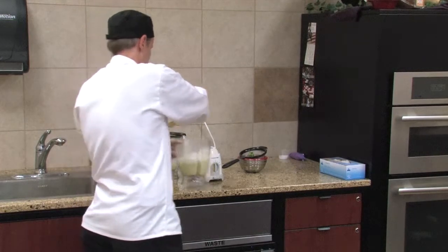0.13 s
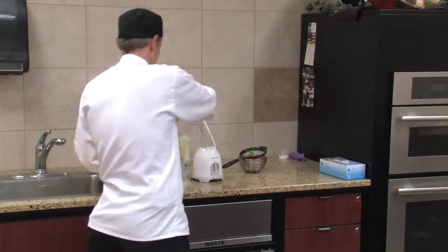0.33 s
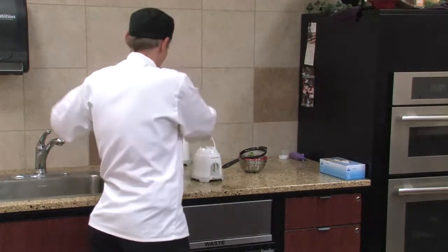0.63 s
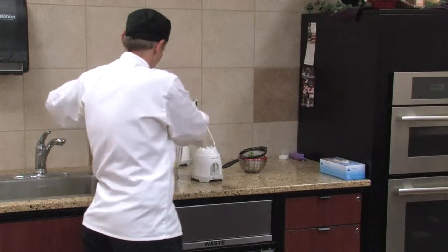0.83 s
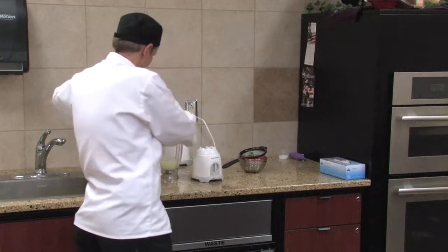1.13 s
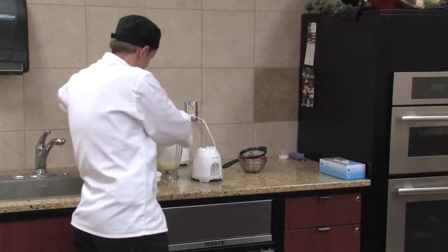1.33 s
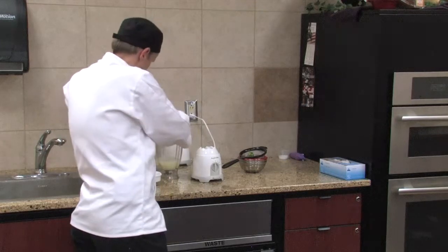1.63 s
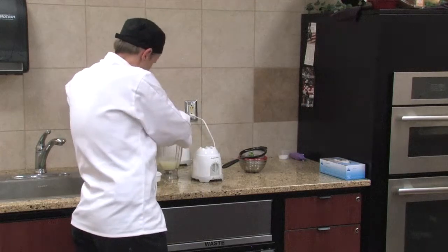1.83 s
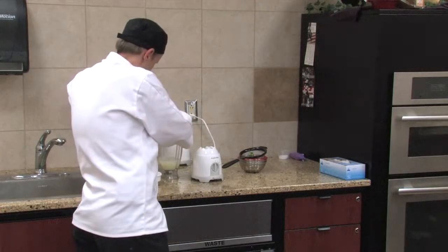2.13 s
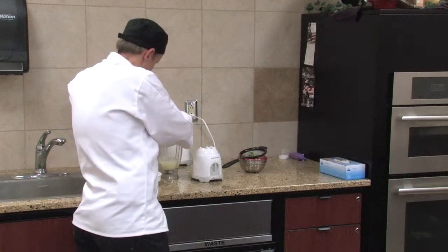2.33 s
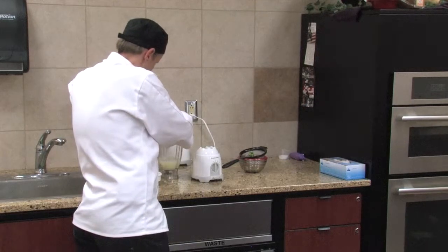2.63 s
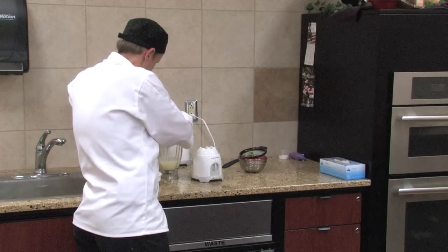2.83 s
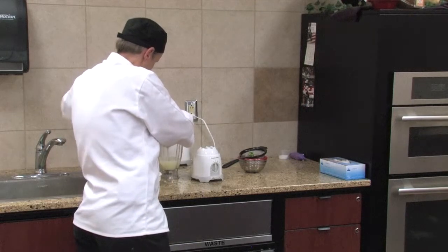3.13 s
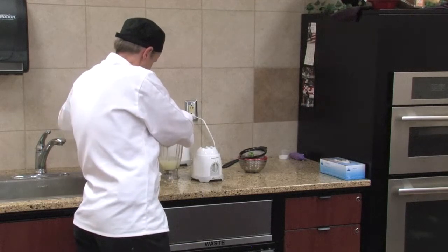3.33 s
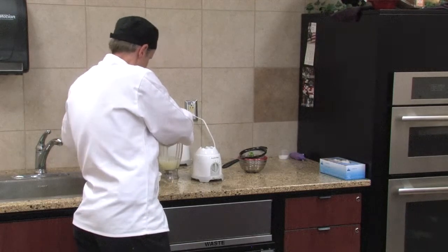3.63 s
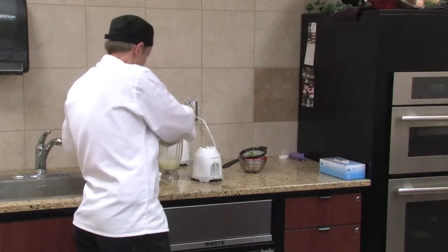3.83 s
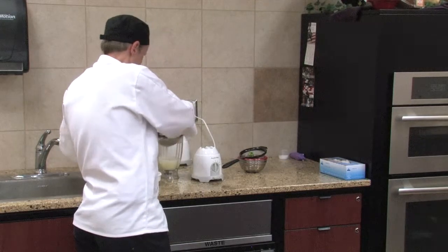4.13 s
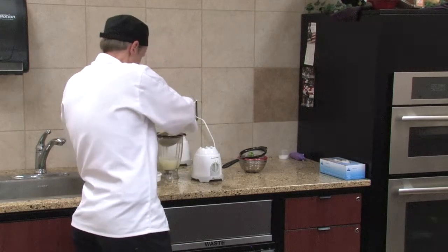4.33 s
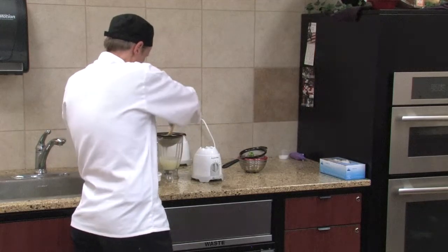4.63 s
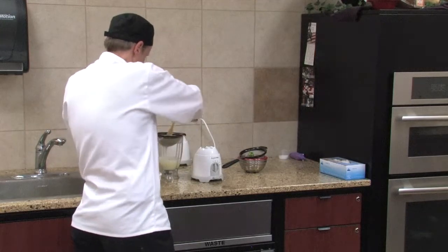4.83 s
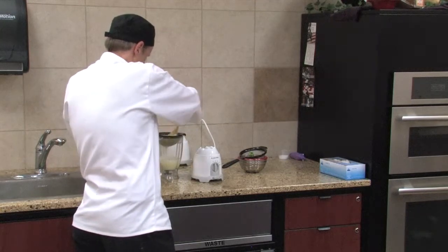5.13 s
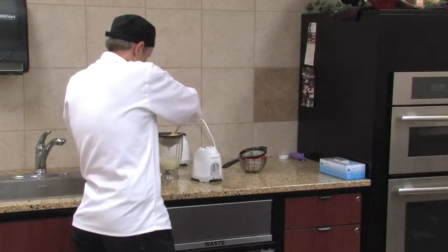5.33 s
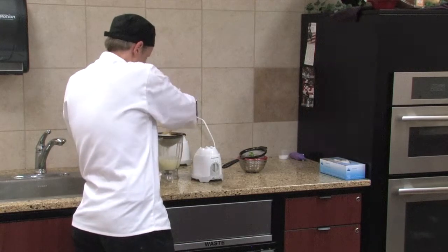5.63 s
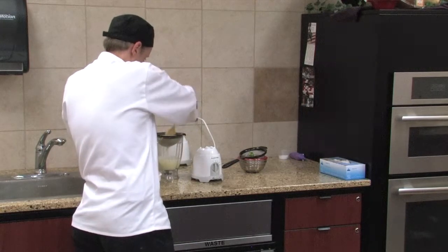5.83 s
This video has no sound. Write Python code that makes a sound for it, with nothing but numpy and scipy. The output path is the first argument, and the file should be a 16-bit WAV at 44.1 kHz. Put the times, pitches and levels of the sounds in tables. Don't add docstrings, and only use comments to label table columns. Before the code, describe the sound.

In a tiled kitchen, hollow glass knocks, a wet pour with glugs, a heavy set-down, then sputtering drips through a metal sieve.

```python
import sys
import numpy as np
from scipy import signal
from scipy.fft import rfft, irfft, next_fast_len
from scipy.io import wavfile
from scipy.ndimage import map_coordinates

SR = 44100
rng = np.random.default_rng(int(sys.argv[2]) if len(sys.argv) > 2 else 0)


def wav_out(sig):
    wavfile.write(sys.argv[1], SR, np.round(np.clip(np.atleast_2d(sig).T, -1, 1) * 32767).astype(np.int16))


def boost_factor(decibels):
    exponent = np.asarray(decibels, float) / 20
    return 10 ** exponent


N = 264578

# frequency in Hz, width in Hz, level in dB.
GLASS_RESONANCES = [(698, 47, 6.5), (1030, 62, -6), (1250, 47, -21), (1590, 53, -4), (2050, 430, -41)]
# time in seconds, frequency in Hz.
AIR_COLUMN = [(0, 480), (2.2, 475), (2.8, 440), (3.3, 415), (4.5, 470), (5.2, 400), (6, 420)]


def unit(x):
    return x / np.sqrt(np.mean(x ** 2) + 1e-20)


def along(points, hz):
    f, v = np.transpose(points)
    return np.interp(np.log(hz + 1), np.log(f + 1), v)


def filtered(x, response):
    m = next_fast_len(len(x) + min(len(x) // 2, 8192))
    hz = np.fft.rfftfreq(m, 1 / SR)
    return irfft(rfft(x, m) * response(hz), m)[:len(x)]


def resonances(peaks):
    def response(f):
        total = 0
        for k, (hz, width, db) in enumerate(peaks):
            damping = 1j * f * width
            total = total + (-1) ** k * boost_factor(db) * damping / (hz * hz - f * f + damping)
        return total
    return response


def add(track, s, sound):
    part = track[round(s * SR):][:len(sound)]
    part += sound[:len(part)]


def wobble(rate):
    knots = rng.standard_normal(int(N * rate / SR) + 4)
    return map_coordinates(knots, [np.arange(N) * rate / SR])


def uneven(spread_db):
    return boost_factor(spread_db * rng.standard_normal(N).clip(-2, 2))


def burst(t, t60, hz, width_hz):
    band = resonances([(hz, width_hz, 0)])
    noise = rng.standard_normal(len(t)) * boost_factor(-60 * t / t60)
    return filtered(noise, lambda f: band(f) ** 3)


def ring(modes, t, attack, scatter_db, turn=0.16):
    tones = 0
    for k, (hz, db, t60) in enumerate(modes):
        strength, phase = rng.standard_normal(2)
        level = boost_factor(db + scatter_db * strength - 60 * t / t60)
        tones = tones + (-1) ** k * level * np.sin(2 * np.pi * (hz * t + turn * phase))
    return tones * (1 - np.exp(-t / attack))


def room(x, wet_db):
    # frequency in Hz, t60 in seconds.
    tiles = [(100, 1), (500, 0.34), (2000, 0.42), (6000, 0.26), (14000, 0.35)]
    hz, t, z = signal.stft(rng.standard_normal(SR // 2), SR, nperseg=256)
    decay = boost_factor(-60 * t / along(tiles, hz)[:, None])
    tail = signal.istft(z * decay, SR, nperseg=256)[1]
    delayed = np.pad(x, (250, 0))
    wet = boost_factor(wet_db) * signal.fftconvolve(delayed, tail / np.linalg.norm(tail))
    wet[:len(x)] += x
    return wet


def knocks(table, body, wall, attack, body_db, rough_db, wall_db, wet_db, thud_db):
    # frequency in Hz, level in dB, t60 in seconds.
    slab = [(70, -6, .15), (97, -1, .15), (118, -2, .16), (160, -1, .14), (220, -5, .1)]
    settle_db = 4
    out, t = np.zeros(N), np.arange(SR // 4) / SR
    for k, (s, db, hollow_db, sharp_db, bright_db) in enumerate(table):
        crack = boost_factor(3.5) * burst(t, 0.049, 1330, 2330)
        crack += boost_factor(sharp_db + 1.5) * burst(t, 0.038, 3530, 3130)
        crack += boost_factor(bright_db + 4.5) * burst(t, 0.037, 6760, 6500)
        hollow = ring(body, t, attack, scatter_db=3.5, turn=0.1)
        hollow += boost_factor(rough_db) * burst(t, 0.18, 380, 910)
        thud = boost_factor(thud_db - settle_db * k) * ring(slab, t, 0.0016, scatter_db=-0.5, turn=0.025)
        blow = boost_factor(db) * (crack + boost_factor(hollow_db + body_db) * hollow) + thud
        add(out, s, room(blow, wet_db))
        rattle = 0.94 + 0.56 * map_coordinates(rng.standard_normal(80), [t * 240])
        add(out, s, boost_factor(db + wall_db) * ring(wall, t, 0.0015, scatter_db=2.5) * rattle)
    return out


def drops(table, cycles, rise, spray_s, spray_db, level_db, spread=1.44):
    out, t = np.zeros(N), np.arange(SR // 12) / SR
    for s, db, hz in table:
        life = cycles / hz
        tone = np.sin(2 * np.pi * hz * t * (1 + rise * t / life))
        bubble = tone * np.exp(-t / life) * (1 - np.exp(-3 * t / life))
        spray = boost_factor(spray_db) * burst(t, spray_s, hz, spread * hz)
        add(out, s, boost_factor(db + level_db) * (bubble + spray))
    return out


def kitchen():
    # frequency in Hz, level in dB per Hz.
    tone_spectrum = [(20, -16), (38, -33), (50, 0.5), (100, -6), (170, -8.5), (250, -12), (390, -16.5),
                     (440, -18.5), (700, -24), (1370, -36.5), (2350, -39.5), (3250, -42), (9800, -46),
                     (15500, -47.5)]
    # frequency in Hz, width in Hz, level in dB.
    hum_lines = [(60.13, 0.83, 1.5), (115.8, 5.6, -10), (92, 7.9, -4.5), (400, 25, -18.5)]
    air = unit(filtered(rng.standard_normal(N), lambda f: boost_factor(along(tone_spectrum, f))))
    lines = resonances(hum_lines)
    hum = unit(filtered(rng.standard_normal(N), lambda f: lines(f) * (f > 45)))
    motor_hz = 58 + 1.44 * wobble(2.66)
    motor = np.sin(2 * np.pi * np.cumsum(motor_hz) / SR)
    return boost_factor(-52) * (boost_factor(-1.5) * air + boost_factor(-6.5) * hum + boost_factor(-5.5) * motor)


def flow(now):
    # time in seconds, flow in dB, weight of its slaps against the flow in dB.
    stretches = [
        [(0.0, -60.5, 3), (0.378, -72, 0.5), (0.62, -82, -5)],
        [(1.715, -64, -23), (1.993, -66.5, 0.5), (2.481, -69, 8.5), (3.02, -69.5, 6)],
        [(3.14, -71, 12.5), (3.522, -77, 6.5), (3.85, -75, 12.5)],
        [(4.08, -63.5, 9.5), (4.244, -68.5, 8.5), (5.036, -73.5, 9.5), (5.234, -68.5, 11.5), (6.0, -70, 5)],
    ]
    level = np.zeros((2, len(now)))
    for rows in stretches:
        s, flow_db, weight_db = np.transpose(rows)
        for gain, curve in zip(level, (flow_db, flow_db + weight_db)):
            gain += boost_factor(np.interp(now, s, curve, left=-120, right=-120))
    return level


def stream():
    # frequency in Hz, level in dB per Hz.
    fizz = [(2000, -6), (2530, -2), (3280, 8), (3710, 2.5), (4340, 4), (7640, 4), (12000, -6), (16000, -9)]
    # frequency in Hz, width in Hz, level in dB.
    foam_sizes = [(3200, 1700, -4.5), (6600, 3400, 7.5), (11000, 5700, 2)]
    fall_s = (1.715, 3.02)
    now = np.arange(N) / SR
    thin, heavy = flow(now)

    clumps = boost_factor(2.4 * wobble(45) + 4.1 * wobble(300))
    spray = unit(filtered(rng.standard_normal(N), lambda f: boost_factor(along(fizz, f))) * clumps)
    crackle_per_s = 350
    pops = (rng.random(N) < crackle_per_s / SR) * uneven(6) * rng.choice([-1, 1], N)
    sizes, t = rng.integers(len(foam_sizes), size=N), np.arange(SR // 100) / SR
    foam = np.zeros(N)
    for k, (hz, width, db) in enumerate(foam_sizes):
        pop = unit(burst(t, 0.0095, hz, width))
        foam += boost_factor(db) * signal.fftconvolve(pops * clumps * (sizes == k), pop)[:N]
    spray += boost_factor(-2.0) * unit(foam) * (now > fall_s[0]) * (now < fall_s[1])

    slaps_per_s = 300
    slaps = (rng.random(N) < slaps_per_s / SR) * rng.standard_normal(N)
    slosh = unit(filtered(slaps, resonances(GLASS_RESONANCES)))
    column_hz = np.interp(now, *np.transpose(AIR_COLUMN)) + 18 * wobble(30)
    air = unit(wobble(45) * np.sin(2 * np.pi * np.cumsum(column_hz) / SR))
    return boost_factor(-5.5) * thin * spray + heavy * (boost_factor(-9.5) * slosh + boost_factor(-5.5) * air)


def patter():
    drops_per_s = 90
    when = (rng.random(N) < drops_per_s / SR) * uneven(5)
    kinds, t = rng.integers(4, size=N), np.arange(SR // 20) / SR
    ticks = np.zeros(N)
    for k in range(4):
        tick = burst(t, 0.025, hz=1400, width_hz=1300)
        ticks += signal.fftconvolve(when * (kinds == k), tick)[:N]
    heavy = flow(np.arange(N) / SR)[1]
    return boost_factor(-16) * heavy * unit(ticks)


def scuffs():
    # start in seconds, length in seconds, level in dB, centre in Hz.
    strokes = [(0.033, 0.07, -64.5, 6260), (0.22, .03, -76, 7500), (2.047, 0.029, -60, 4600),
               (2.467, 0.047, -65, 5300), (2.781, 0.033, -64.5, 4870), (4.135, 0.035, -72, 11000),
               (4.129, 0.047, -58, 4900), (5.446, 0.083, -68, 3500), (5.774, 0.12, -63.5, 4200)]
    out = np.zeros(N + SR)
    for s, length, db, hz in strokes:
        swell = np.hanning(round(0.75 * length * SR)) ** 0.5
        knots = rng.standard_normal(60)
        grain = boost_factor(0.54 * map_coordinates(knots, [np.arange(len(swell)) * 400 / SR]))
        steady = unit(burst(np.zeros(len(swell)), 1, hz, 1.5 * hz))
        add(out, s, boost_factor(db) * swell * grain * steady)
    return out[:N]


def hand_ticks():
    # time in seconds, peak in dB, pitch in Hz.
    ticks = [(0.075, -48, 4300), (0.5182, -50, 5420), (0.598, -50.5, 6330), (1.3712, -49.5, 11600),
             (4.3076, -52.5, 8630), (4.4902, -51, 4420), (4.5735, -44, 5950), (4.6354, -45.5, 4550),
             (4.7361, -48, 4150), (4.8514, -52, 4010), (4.9332, -48, 3920), (5.1457, -50, 4000),
             (5.243, -49, 4560), (5.2874, -49, 6250), (5.3936, -52, 4500), (5.502, -53, 4570),
             (5.7967, -52, 5170), (5.8476, -42, 3960), (5.893, -48, 4570), (0.2049, -45.5, 2800)]
    return drops(ticks, 5.7, 0.0052, 0.031, spray_db=-1.0, level_db=-5.5, spread=1.3)


def splats():
    # time in seconds, peak in dB, pitch in Hz.
    free_blobs = [(0.112, -50.5, 810), (0.151, -42.5, 608), (0.259, -51.5, 775), (1.721, -52.5, 1890),
                  (1.876, -55, 1440), (1.922, -54, 1150), (2.051, -52, 1900), (2.074, -46, 1393),
                  (2.246, -49, 1096), (2.342, -50, 1030), (2.393, -49, 1070), (2.492, -48.5, 1660),
                  (2.541, -41, 1030), (2.61, -55, 1670), (2.639, -50, 1415), (2.751, -44, 995),
                  (2.774, -51, 1420), (2.954, -51.5, 1450), (2.987, -48, 1030), (3.249, -51, 972),
                  (3.373, -53, 950), (3.464, -56, 1250), (3.593, -45.5, 1000), (3.655, -52.5, 1445),
                  (3.695, -57, 1640), (3.747, -46, 974), (3.797, -45.5, 1000)]
    # time in seconds, peak in dB, pitch in Hz.
    mesh_blobs = [(4.1064, -68, 1040), (4.2348, -54, 991), (4.2931, -43, 1590), (4.4927, -44.5, 1530),
                  (4.5421, -39, 1004), (4.6523, -47.5, 1190), (4.6813, -44.5, 1204), (4.7366, -49.5, 903),
                  (4.9038, -50, 1570), (4.9631, -50, 1490), (5.0519, -53, 1200), (5.1183, -51.5, 1180),
                  (5.1472, -63, 1020), (5.1911, -48, 1010), (5.2305, -51, 1040), (5.3527, -55, 1580),
                  (5.3946, -42, 1023), (5.477, -39, 1030), (5.5044, -46, 1640), (5.658, -41, 964),
                  (5.7568, -44.5, 1000), (5.7857, -45, 1010), (5.8486, -49, 990), (5.914, -49.5, 1300)]
    blobs = drops(free_blobs + mesh_blobs, 7, 0.018, 0.06, spray_db=7.0, level_db=-4.5, spread=1.25)
    return blobs + boost_factor(8.5) * filtered(blobs, resonances(GLASS_RESONANCES))


def droplets():
    # time in seconds, peak in dB, pitch in Hz.
    fingers = [(0.1216, -46, 5800), (0.1296, -46, 3400), (0.1496, -49, 5100), (0.2314, -58, 8500),
               (0.2405, -56, 4860), (0.288, -71, 3150), (0.3536, -48, 4020), (0.3726, -53, 3630),
               (0.4589, -59, 7590)]
    # time in seconds, peak in dB, pitch in Hz.
    bursting = [(1.7193, -45.5, 5500), (1.7593, -56, 6270), (1.7762, -54, 7100), (1.8091, -55, 6700),
                (1.8206, -58, 4440), (1.8401, -61, 6760), (1.862, -46, 6750), (1.9229, -60, 6910),
                (1.9329, -52, 6780), (1.9334, -45, 9500), (1.9668, -58, 5960), (1.9718, -58, 6030),
                (1.9872, -52, 4450), (2.02, -53, 5300), (2.0586, -58, 4200), (2.0583, -46.5, 9150),
                (2.0765, -39, 4350), (2.109, -50, 4300), (2.1578, -51, 5800), (2.182, -47, 5260),
                (2.2167, -65, 4200), (2.2167, -50, 6740), (2.2656, -66, 7040), (2.2658, -48.5, 4350),
                (2.2965, -52, 7600), (2.3235, -46.5, 7350), (2.3704, -56, 4480), (2.3908, -49, 5750),
                (2.4113, -57, 7430), (2.4183, -55, 4220), (2.4557, -56, 4300), (2.4806, -55, 5640),
                (2.4811, -50, 4300), (2.538, -52, 5240), (2.5524, -48, 6570), (2.587, -52, 5930),
                (2.6462, -66, 7630), (2.6582, -59, 6000), (2.6716, -52, 5990), (2.6966, -52, 4330),
                (2.7463, -53, 5950), (2.7884, -57, 7500), (2.7884, -48, 4710), (2.8258, -65, 4320),
                (2.856, -55, 4230), (2.8842, -56, 4620), (2.9121, -52, 7400), (2.9485, -57, 5670),
                (2.9835, -60, 6010), (3.0079, -59, 6360)]
    return drops(bursting + fingers, 10, 0.004, 0.022, spray_db=3, level_db=-4, spread=1.2)


def low_clinks():
    # time in seconds, peak in dB.
    touches = [(0.1521, -54.5), (3.2544, -61), (3.2954, -66), (3.4336, -59.5)]
    second_mode_hz = 2060
    pitched = [(s, db, second_mode_hz) for s, db in touches]
    return drops(pitched, 11, 0.001, 0.015, spray_db=6, level_db=2.5)


def rim_knocks():
    # time in seconds, crack peak in dB, then hollow, sharp and bright parts in dB against the crack.
    blows = [(0.6614, -31, -1, -4, -20.5), (0.7658, -29.5, -2, 0.5, -36), (0.7944, -46.5, 10, -10, -19),
             (0.8119, -30, 1.5, -3, -20.5), (0.9158, -29.5, -8.5, 9.5, -5), (0.9317, -46, 13.5, -23, -26),
             (0.9492, -33, -4.5, -2, -32), (0.9714, -40, 5.5, -18, -33)]
    # frequency in Hz, level in dB, t60 in seconds.
    hollow_jar = [(300, -13.5, 0.067), (393, -7.5, 0.079), (436, -0.5, 0.036), (506, 4.5, 0.067),
                  (583, -29, 0.018), (715, -21, 0.089), (803, -4.5, 0.027)]
    # frequency in Hz, level in dB, t60 in seconds.
    glass_wall = [(1338, -2.5, 0.14), (1686, 6, 0.068), (1890, -14, 0.14), (2453, -1.5, 0.061),
                  (3230, -7, 0.089), (3400, 9, 0.018), (3720, 5.5, 0.027), (5020, -13, 0.045)]
    return knocks(blows, hollow_jar, glass_wall, 0.004, body_db=7, rough_db=-7,
                  wall_db=-13.0, wet_db=-14, thud_db=-45.5)


def snaps():
    # time in seconds, peak in dB, pitch in Hz.
    wires = [(0.8764, -61, 10400), (3.1552, -54, 7430), (3.4615, -54, 10700), (3.7459, -57, 12300),
             (3.9454, -56, 12200), (4.1056, -43, 12500), (4.1061, -41, 7400), (4.1415, -38, 11400),
             (4.327, -56, 7000), (4.435, -63, 7500), (4.564, -59, 8500), (4.6493, -56, 8000),
             (4.714, -60, 8000), (4.802, -63, 7000), (4.9112, -56, 8420), (4.9337, -56, 8410),
             (5.3063, -54, 8610)]
    return drops(wires, 6, 0.004, 0.013, spray_db=2.5, level_db=-5.0, spread=0.84)


def flecks():
    # time in seconds, peak in dB, pitch in Hz.
    flicks = [(1.7193, -60, 2610), (1.7702, -53, 2850), (1.8016, -63, 2990), (1.8425, -66, 2900),
              (1.862, -60, 4000), (1.8764, -57, 2800), (1.9183, -59, 1940), (1.9667, -63, 3110),
              (1.9877, -54, 3250), (2.0206, -49.5, 3250), (2.059, -47, 3170), (2.0765, -46, 3240),
              (2.1089, -58, 3270), (2.1538, -53, 2800), (2.2172, -55, 2860), (2.2655, -55, 3290),
              (2.2925, -51, 3150), (2.3229, -50, 3560), (2.3414, -54, 2020), (2.3718, -59, 3140),
              (2.3833, -55, 3220), (2.4187, -53, 3930), (2.4551, -56, 1980), (2.4701, -51, 3170),
              (2.5389, -68, 2050), (2.5524, -60, 1880), (2.5863, -51, 3890), (2.6068, -63, 1960),
              (2.6367, -73, 1900), (2.6646, -63, 1980), (2.6961, -59, 1900), (2.7465, -57, 3230),
              (2.7709, -66, 2400), (2.7884, -59, 3480), (2.8467, -58, 3540), (2.9141, -57, 2870),
              (2.9505, -55, 4000), (2.9859, -66, 3570)]
    return drops(flicks, 10, 0.004, 0.041, spray_db=1.5, level_db=-2, spread=0.99)


def neck_pings():
    # time in seconds, peak in dB, pitch in Hz.
    pings = [(2.0283, -60, 1540), (2.0507, -52, 1580), (2.073, -49, 1492), (2.1315, -71, 1520),
             (2.2099, -67, 1530), (2.2493, -62, 1760), (2.281, -62, 1600), (2.3046, -56, 1480),
             (2.3413, -60, 1755), (2.3934, -64, 1540), (2.4239, -58, 1660), (2.4553, -63, 1560),
             (2.4915, -49, 1640), (2.541, -48, 1300), (2.586, -53, 1560), (2.6104, -48, 1660),
             (2.639, -54, 1470), (2.6683, -57, 1660), (2.6962, -58, 1550), (2.7466, -65, 1570),
             (2.7741, -51, 1490), (2.856, -54, 1560), (2.8823, -63, 1410), (2.9537, -62, 1480),
             (2.9896, -61, 1530)]
    return drops(pings, 10.4, 0.0039, 0.03, spray_db=4, level_db=0.0, spread=0.72)


def glugs():
    # time in seconds, peak in dB.
    pumps = [(2.077, -49), (2.176, -55), (2.215, -42), (2.271, -44), (2.32, -47), (2.344, -45.5),
             (2.397, -47), (2.458, -45.5), (2.495, -45.5), (2.544, -42.5), (2.591, -39.5), (2.669, -46.5),
             (2.699, -44.5), (2.75, -42), (2.795, -44), (2.826, -46), (2.986, -48), (3.749, -44),
             (4.481, -50), (4.502, -44), (4.547, -43), (4.68, -55), (5.039, -55), (5.193, -45.5),
             (5.236, -49), (5.485, -43.5), (5.502, -44), (5.661, -47.5), (5.851, -40), (5.873, -49)]
    column = [(s, db, np.interp(s, *np.transpose(AIR_COLUMN))) for s, db in pumps]
    return drops(column, 3.33, 0.0054, 0.15, spray_db=-5, level_db=5.5)


def sieve_knocks():
    # time in seconds, crack peak in dB, then hollow, sharp and bright parts in dB against the crack.
    blows = [
        (3.0415, -32, -9, -23, -22),
        (3.0594, -41, 8, 5.5, -2),
        (3.0734, -56.5, 21.5, -16, -18),
        (4.5463, -43.5, -2, 0, -15),
    ]
    # frequency in Hz, level in dB, t60 in seconds.
    bowl = [(325, -4, 0.089), (409, 3.5, 0.06), (440, 14, 0.014), (490, 7, 0.036), (597, 1.5, 0.025)]
    # frequency in Hz, level in dB, t60 in seconds.
    rim = [(950, 0, 0.11), (1180, 18, 0.014), (1300, -4, 0.09), (1627, 7, 0.052), (2326, -17, 0.022),
           (3220, -43, 0.042), (3360, -5, 0.029), (4200, -38, 0.024)]
    return knocks(blows, bowl, rim, 0.0038, body_db=1.0, rough_db=1.0,
                  wall_db=-15.5, wet_db=-15.0, thud_db=-49)


def clinks():
    # time in seconds, peak in dB, pitch in Hz.
    touches = [(3.2236, -55.5, 3510), (3.3882, -68, 3530), (3.466, -66, 3510), (3.5184, -61, 3300),
               (3.5314, -62, 3520), (3.8202, -61, 3520), (4.4478, -60, 3520), (4.4902, -55, 3510),
               (4.5131, -52, 3520), (4.5461, -52, 3140), (4.5644, -55, 3530), (4.594, -62, 3480),
               (4.6394, -61, 3520), (4.6658, -59, 3900), (4.6794, -61, 3540), (4.7167, -61, 3360),
               (4.7371, -60, 3480), (4.8014, -69, 3380), (4.8539, -58.5, 3500), (4.9043, -59, 3500),
               (4.9337, -61, 3550), (5.1233, -61, 3460), (5.1457, -62, 3510), (5.1637, -52.5, 3420),
               (5.1794, -62, 3480), (5.232, -51.5, 3510), (5.2614, -56, 3490), (5.2854, -56, 3490),
               (5.3308, -69, 3460), (5.3537, -58, 3470), (5.3936, -57, 3490), (5.6396, -71, 3460),
               (5.7962, -56, 3830)]
    return drops(touches, 18, 0.0023, 0.023, spray_db=-0.5, level_db=2.5, spread=0.62)


def handle():
    # time in seconds, peak in dB.
    steadying = [(3.594, -56), (3.6546, -53), (3.696, -59), (3.7464, -59), (3.7674, -59), (3.797, -52)]
    # time in seconds, peak in dB.
    taps = [(4.2354, -47), (4.292, -55), (4.491, -50), (4.5468, -50), (4.738, -48.5), (4.9038, -55.5),
            (4.963, -58), (5.0519, -59), (5.1906, -51.5), (5.353, -55), (5.3946, -45), (5.4764, -57),
            (5.5044, -49), (5.659, -51), (5.7568, -58), (5.849, -44), (5.914, -57)]
    # frequency in Hz, level in dB, t60 in seconds.
    frame = [(1000, -4, .025), (1580, 0, .03), (2290, -4, .018), (3050, -12, .015)]
    out, t = np.zeros(N), np.arange(SR // 10) / SR
    for s, db in taps + steadying:
        tap = ring(frame, t, 0.00055, scatter_db=6.5) + boost_factor(6) * burst(t, 0.02, 1750, 2500)
        add(out, s, boost_factor(db - 8.5) * tap)
    return out


def set_down():
    # time in seconds, crack peak in dB, then hollow, sharp and bright parts in dB against the crack.
    landing = [
        (3.8701, -23.5, 4.5, -9.5, -19.5),
        (3.8779, -37, 2.4, -16, -13),
        (3.907, -35.5, 9.7, 1, -17),
        (3.9358, -47.5, 14.3, -16, -24),
    ]
    rocking = [
        (4.0012, -30.5, 9, 0, -12),
        (4.0099, -33, 13.4, -25, -32.5),
        (4.0193, -45, 16, -2, -29),
    ]
    # frequency in Hz, level in dB, t60 in seconds.
    first_edge = [(266, -7, 0.088), (284, 1.5, 0.046), (400, 0.5, 0.073), (440, -5, 0.06), (488, 6, 0.028),
                  (613, 5.5, 0.033), (735, -5, 0.036), (820, -1.5, 0.056), (891, -10, 0.072)]
    # frequency in Hz, level in dB, t60 in seconds.
    other_edge = [(271, -14, 0.13), (304, -5, 0.1), (380, -0.5, 0.073), (465, 0.5, 0.072),
                  (523, -13, 0.038), (634, 4, 0.051), (733, -17, 0.039)]
    # frequency in Hz, level in dB, t60 in seconds.
    base = [(1300, 3.5, 0.046), (1660, -10, 0.037), (1784, -3, 0.053), (2410, 3, 0.037), (2950, 6, 0.023),
            (3310, 2.5, 0.026), (5110, -6, 0.031)]
    hits = knocks(landing, first_edge, base, 0.003, body_db=1.0, rough_db=2,
                  wall_db=-12.5, wet_db=-11.5, thud_db=-27)
    return hits + knocks(rocking, other_edge, base, 0.0013, body_db=-0.5, rough_db=-5.5,
                         wall_db=-7.5, wet_db=-12, thud_db=-35.5)


def scene():
    pour = stream() + patter() + scuffs() + hand_ticks() + splats() + droplets() + low_clinks()
    pour += snaps() + flecks() + neck_pings() + glugs() + clinks() + handle()
    hits = rim_knocks() + sieve_knocks() + set_down()
    return (kitchen() + hits + room(pour, wet_db=-9.5)[:N])[None]


def roll_off(x):
    return signal.sosfilt(signal.butter(12, 16600, fs=SR, output="sos"), x)


def record(dry):
    top_hz = 15850
    mix = filtered(dry[0], lambda f: f < top_hz)[None]
    return roll_off(mix)


dry = scene()
out = record(dry)
wav_out(out)
```